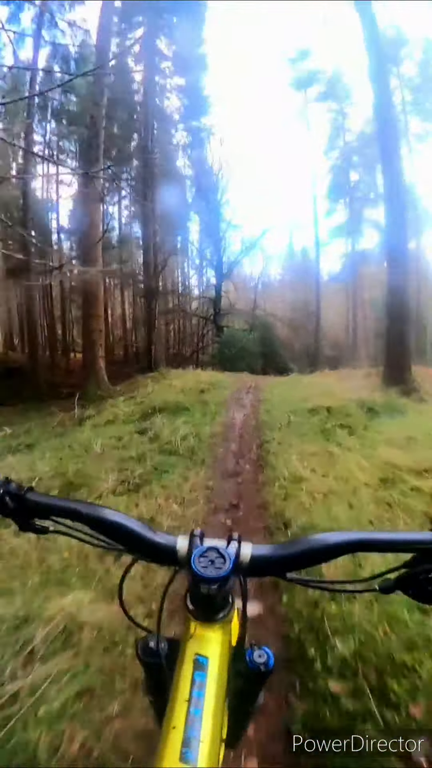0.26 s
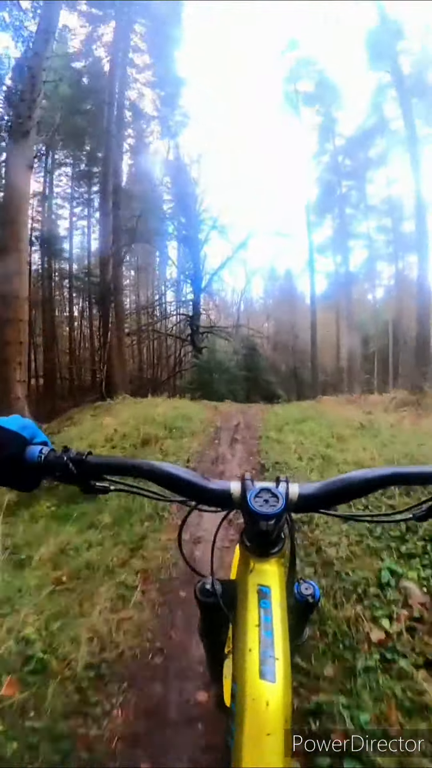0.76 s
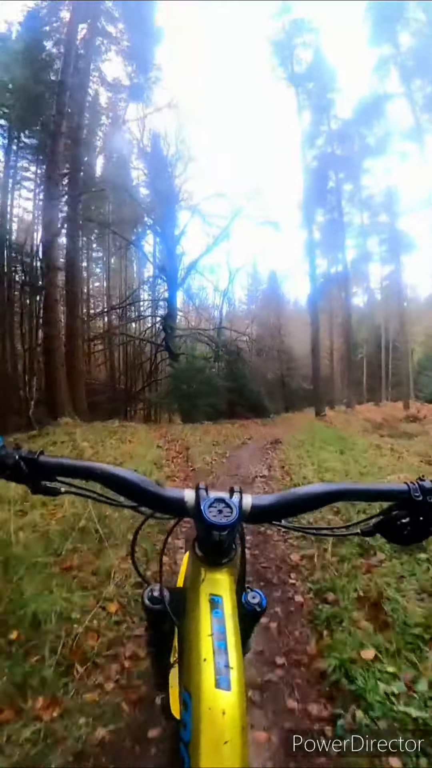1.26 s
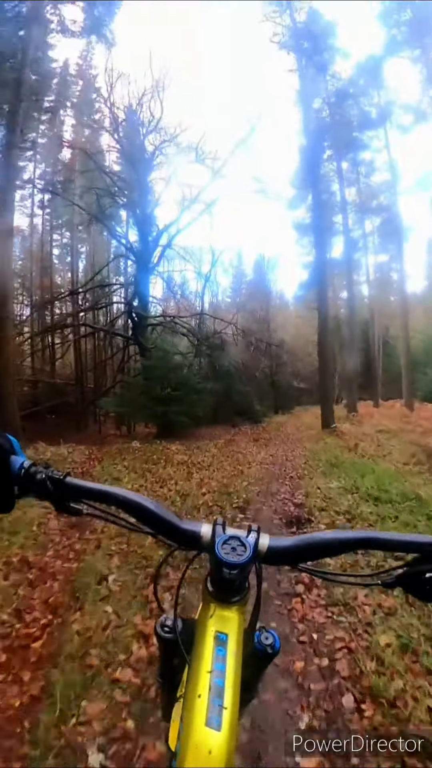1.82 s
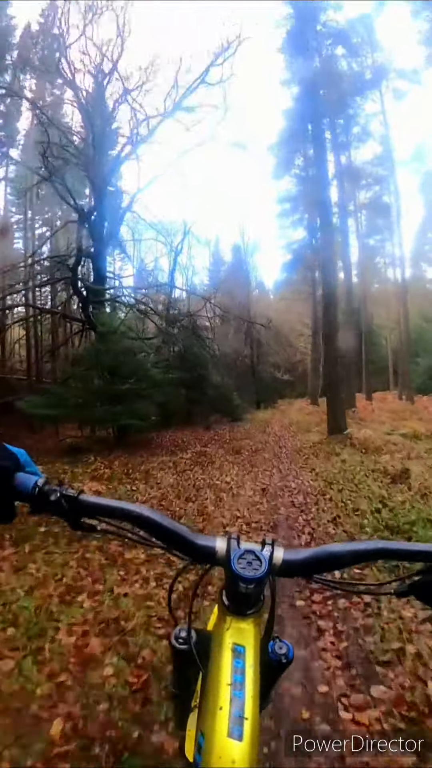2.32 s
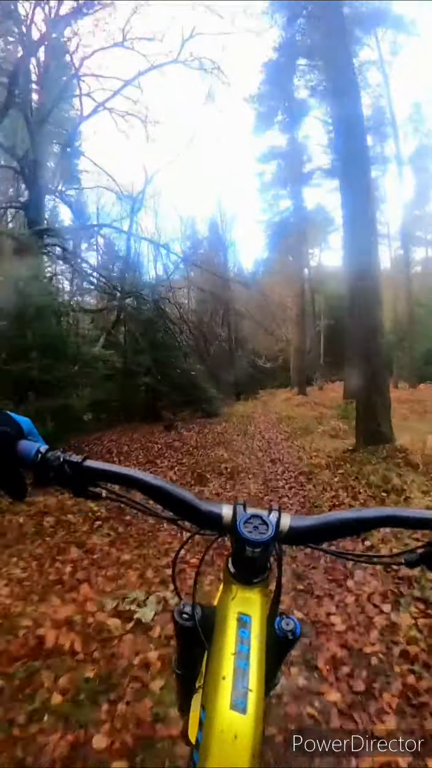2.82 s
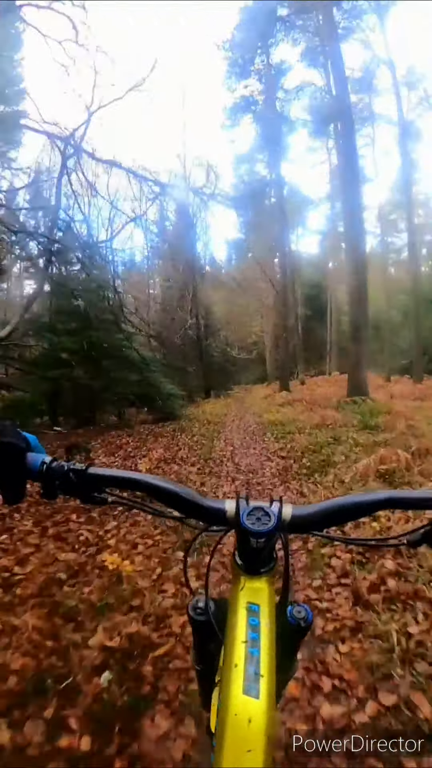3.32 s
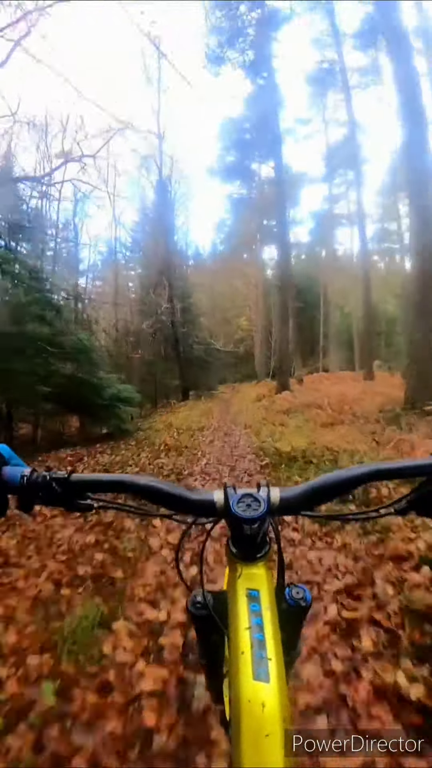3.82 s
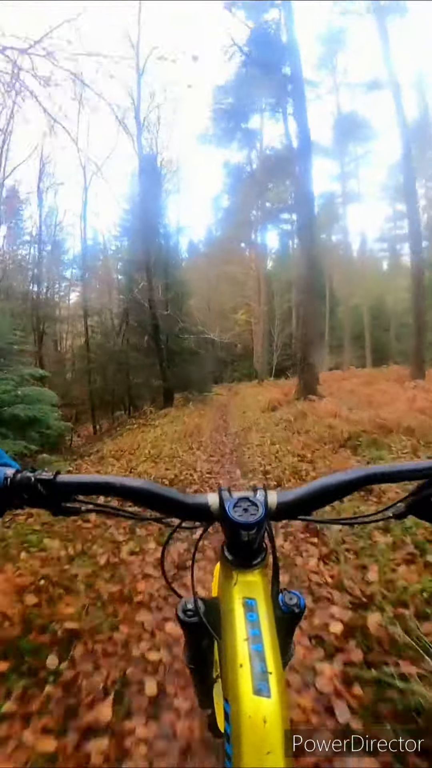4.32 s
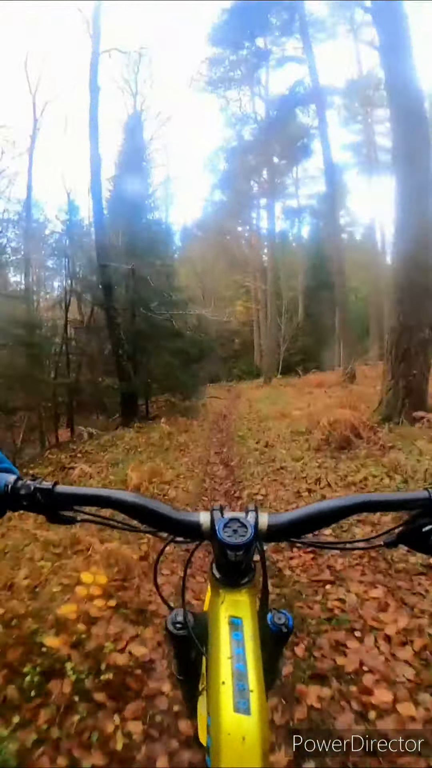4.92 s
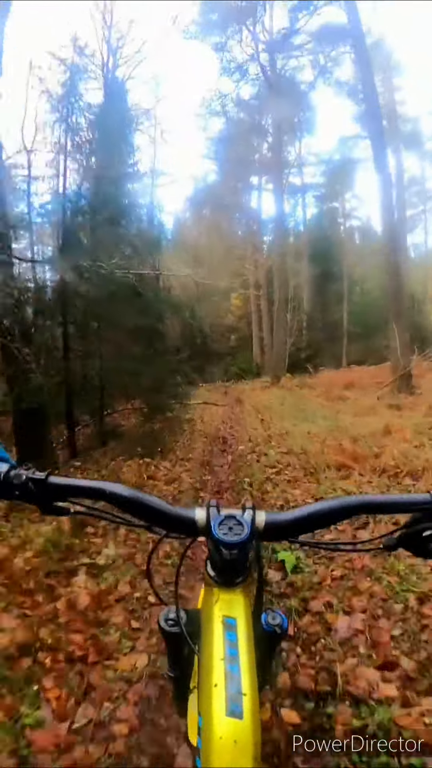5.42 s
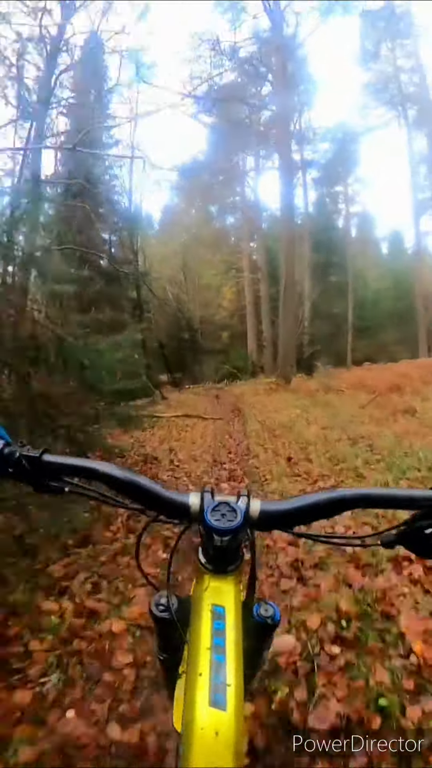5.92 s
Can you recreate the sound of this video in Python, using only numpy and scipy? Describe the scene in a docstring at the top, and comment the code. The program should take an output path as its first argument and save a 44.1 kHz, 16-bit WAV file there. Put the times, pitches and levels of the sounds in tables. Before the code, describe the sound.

Heard from a small microphone worn by the rider, a mountain bike jolts over a leaf-covered forest trail. The first second is loud, with low rumble, hollow tyre thumps, sharp twig snaps and dense crunching leaves. It then drops to soft drumming with faint rubbing and light bumps. After about three seconds the bike gathers speed, and crackle, snaps and thuds crowd back until the end.

```python
"""A mountain bike rolls down a leafy forest trail, heard through one small body-worn microphone.
A rough first second is dense with drumming, bumps, snaps and crackle; a quieter stretch with three soft rubs
follows, and from about 3 s the bike gathers speed and the crackle and bumps crowd together again.
Rumble, hiss and rustle are shaped noise; drumming is noise and ringing modes; bumps and snaps are decaying
sines; litter crackles as many tiny breaks over a continuous scratch."""
import sys
import numpy as np
from scipy import signal
from scipy.fft import rfft, irfft, next_fast_len
from scipy.io import wavfile
from scipy.ndimage import uniform_filter1d, map_coordinates

SR = 44100
rng = np.random.default_rng(int(sys.argv[2]) if len(sys.argv) > 2 else 0)


def file_out(sig):
    """Save sig as 16-bit WAV at sys.argv[1]."""
    # one column per channel
    cols = np.atleast_2d(sig).T
    # limit, then scale
    lim = np.clip(cols, -1, 1)
    pcm = np.round(lim * 32767).astype(np.int16)
    wavfile.write(sys.argv[1], SR, pcm)


N = 271656

# The ride: rough start, smooth stretch, then gathering speed.
# Each row: time in seconds, then shaking, coarse litter and fine leaves, each a relative level in dB.
RIDE = [(0.0, -31, -44, -54), (0.14, -32.5, -44.5, -55.5), (0.43, -29, -40, -48.5), (0.88, -29.5, -44, -55),
        (1.0, -38, -49, -57.5), (1.63, -40, -53.5, -54), (1.95, -41, -52.5, -59), (2.05, -40, -53.5, -58.5),
        (2.3, -38, -53, -54.5), (2.6, -39.5, -49, -53), (2.8, -40.5, -49, -53), (3.1, -36.5, -49.5, -49.5),
        (3.55, -32.5, -50.5, -49.5), (3.94, -34.5, -46, -46.5), (4.34, -33, -50, -48),
        (5.1, -30.5, -46.5, -47), (5.3, -33, -47.5, -47.5), (5.7, -31, -43, -49), (6.16, -34.5, -43, -47)]
CRUISE_DB = -34  # the shaking level against which the other layers are scaled


def amp(db):
    """Decibels to amplitude: 20 dB is a factor of ten."""
    return 10 ** (np.asarray(db) / 20)


def unit(x):
    """Normalisation to a root-mean-square of 1."""
    return x / np.sqrt(np.mean(x ** 2) + 1e-20)


def curves(rows):
    """Linear interpolation in time: one value per sample for each column after the time."""
    s, *cols = np.transpose(rows)
    return [np.interp(np.arange(N) / SR, s, c) for c in cols]


def wobble(rate):
    """Slow random modulation: a smooth curve through rate random knots a second."""
    knots = rng.standard_normal(int(N * rate / SR) + 4)
    return map_coordinates(knots, [np.arange(N) * rate / SR])


def filtered(x, response):
    """Linear filtering: the spectrum of x times a complex response of frequency."""
    m = next_fast_len(len(x) + 8192)  # padding leaves room for the filter's tail
    return irfft(rfft(x, m) * response(np.fft.rfftfreq(m, 1 / SR)), m)[:len(x)]


def coloured(x, points):
    """Spectral shaping by (Hz, dB) points joined on a logarithmic frequency axis, brought to rms 1."""
    f, db = np.transpose(points)
    return unit(filtered(x, lambda hz: amp(np.interp(np.log(hz + 1), np.log(f + 1), db))))


def resonance(f, centre_hz, width_hz):
    """Response of a damped resonator: a causal band-pass of gain 1 at its centre."""
    return 1j * f * width_hz / (centre_hz ** 2 - f * f + 1j * f * width_hz + 1e-9)


def crackle(size, per_s, centre_hz, octaves, share):
    """Granular noise: random small breaks, each a few decaying cycles, over a continuous scratch."""
    when, pitch, strength = rng.random((int(size * per_s / SR), 3)).T
    hz = centre_hz * 2 ** (octaves * (2 * pitch - 1))
    turns = np.arange(96) * hz[:, None] / SR  # cycles elapsed in each 96-sample grain
    fade = amp(-16 * strength[:, None] - 17.7 * turns)  # uneven strength, then 17.7 dB lost a cycle
    grains = fade * np.sin(2 * np.pi * turns) * np.sqrt(hz[:, None])
    place = (when * size).astype(int)[:, None] + np.arange(96)
    breaks = np.bincount(place.ravel(), grains.ravel(), size + 96)[:size]
    scratch = rng.standard_normal(size)
    return np.sqrt(share) * unit(breaks) + np.sqrt(1 - share) * scratch  # share is of the power


def patchy(x, patchy_db):
    """Time-frequency modulation: random gains in patches several hundred Hz by some hundredths of a second."""
    z = signal.stft(x, nperseg=256)[2]
    across_hz = uniform_filter1d(rng.standard_normal(z.shape), size=4, axis=0)
    field = uniform_filter1d(across_hz, size=8, axis=1)
    return signal.istft(z * amp(patchy_db * unit(field)), nperseg=256)[1][:N]


def load():
    """Contact force as a gain: rolling noise dips as the wheels go light over a hollow."""
    # Each row: centre in seconds, depth in dB (negative for a rise).
    hops = [(0.38, 4.5), (2.762, 2.5), (4.768, 4), (4.93, 2), (5.366, 4), (5.47, -1), (5.555, 1.5),
            (5.8, 2), (5.938, 4.5)]
    half_length_s = 0.033  # from the centre to 1/e of the depth
    t = np.arange(N) / SR
    return amp(-sum(db * np.exp(-((t - s) / half_length_s) ** 2) for s, db in hops))


def side_hiss():
    """Modulated noise: a faint flickering hiss that grows 0.84 dB per dB of shaking."""
    # Each row: frequency in Hz, relative gain in dB.
    hiss_spectrum = [(18, -37), (30, -8), (59, -16), (112, -31), (288, -19), (5850, -15), (9620, -18),
                     (11400, -42), (14900, -72), (22000, -120)]
    flicker_db = 14 * np.tanh(1.5 * wobble(14))  # bounded swings
    shake_db = curves(RIDE)[0]
    level_db = -77.0 + flicker_db + 0.84 * (shake_db - CRUISE_DB)
    return amp(level_db) * coloured(rng.standard_normal(N), hiss_spectrum)


def floor_hiss():
    """Stationary noise, slowly modulated: the hiss of tread and microphone under everything."""
    # Each row: frequency in Hz, relative gain in dB.
    floor_spectrum = [(760, -12), (1300, -19), (1960, 1), (2350, -5.5), (2720, -21.5), (5950, -10),
                      (8480, -19.5), (9200, -39), (9990, -21), (11400, -41), (14900, -101), (22000, -120)]
    return amp(-56.5 + 1.9 * wobble(7.4)) * coloured(rng.standard_normal(N), floor_spectrum)


def rumble():
    """Low-frequency pressure from air and shaking pushes in slow lumps; a heavy jolt adds one brief heave."""
    # Each row: frequency in Hz, relative gain in dB.
    rumble_spectrum = [(2.9, -36), (5.0, -0.5), (28, -3), (45, -8.5), (76, -17), (170, -27), (220, -26),
                       (370, -120)]
    # Heavy jolts, and one low thump near 180 Hz at 0.875 s. Each row: start in seconds, level in dB, swing
    # frequency in Hz.
    jolts = [(0.07, -16.5, 24), (0.197, -21.5, 61), (0.3, -23, 35.6), (0.35, -28, 45), (0.425, -20.5, 54.3),
             (0.509, -19.5, 28), (0.64, -20.5, 40), (0.875, -23, 179), (0.915, -22.5, 56), (1.13, -26, 35),
             (1.99, -33.5, 40), (2.145, -35, 38.2), (2.235, -39, 40), (2.42, -34, 39.8), (2.71, -31.5, 40),
             (2.8, -32, 40), (2.911, -25.5, 29.3), (3.519, -27, 50), (3.649, -24, 27.4), (3.915, -23, 48.4),
             (4.041, -20, 27.1), (4.249, -22.5, 54.4), (5.268, -31, 35.2), (5.421, -21.5, 23.8),
             (5.63, -21, 27.7)]
    swings = 1.4  # cycles in one heave
    lumps = amp(2.0 * wobble(15)) * rng.standard_normal(N)
    out, t = np.zeros(N + SR), np.arange(SR // 5) / SR
    for (s, db, hz), turn in zip(jolts, rng.random(len(jolts))):
        swell = np.sin(np.pi * np.clip(t * hz / swings, 0, 1)) ** 2
        heave = swell * np.sin(2 * np.pi * (hz * t + turn))
        out[round(s * SR):][:len(t)] += amp(db) * heave
    return amp(curves(RIDE)[0]) * coloured(lumps, rumble_spectrum) + out[:N]


def rubs():
    """Friction noise in one resonant band: something soft drags against the tyre, swelling and fading."""
    # Each row: start in seconds, length in seconds, level in dB before the swell, centre in Hz.
    drags = [(1.77, 0.28, -54, 564), (1.7, 0.033, -44, 470), (1.37, 0.076, -52, 650)]
    t = np.arange(N) / SR
    out = np.zeros(N)
    for s, length, db, hz in drags:
        swell = np.sqrt(np.abs(np.sin(np.pi * np.clip((t - s) / length, 0, 1))))
        grain = amp(1.5 * wobble(40.0)) * rng.standard_normal(N)
        band = filtered(grain, lambda f: resonance(f, hz, 0.34 * hz) ** 2)
        out += amp(db) * swell * unit(band)
    return out


def snaps():
    """Impulsive fracture: twigs and loose parts ring a few cycles in three partials, over a wide dry crack."""
    # Each row: start in seconds, level in dB, pitch in Hz.
    ticks = [(0.077, -26, 1700), (0.183, -22, 1120), (0.2, -24, 2190), (0.229, -29, 2800),
             (0.248, -21, 4830), (0.268, -21, 1740), (0.284, -18, 1740), (0.307, -20, 1570),
             (0.319, -22, 835), (0.351, -27, 1300), (0.406, -21, 877), (0.433, -28, 895),
             (0.45, -17.5, 2180), (0.517, -13, 930), (0.541, -28, 940), (0.565, -22, 950),
             (0.598, -27, 1090), (0.618, -27, 1510), (0.644, -23, 855), (0.651, -19.5, 865),
             (0.668, -33, 5000), (0.7, -21, 1570), (0.728, -21, 1710), (0.744, -25, 1700),
             (0.765, -26, 860), (0.792, -41, 1650), (0.803, -40, 1670), (0.781, -28, 5400),
             (0.813, -28, 1170), (0.826, -24, 5400), (0.897, -28, 810), (0.984, -34, 1130),
             (3.122, -22.5, 1760), (3.445, -27, 3250), (3.572, -30, 3130), (3.576, -33, 1660),
             (3.697, -28, 2270), (3.708, -16, 2860), (3.757, -28, 3140), (3.79, -21, 870),
             (3.827, -24.5, 2490), (3.875, -24, 3700), (3.92, -21, 4000), (3.926, -27, 2200),
             (4.0, -25, 3500), (4.075, -28, 1000), (4.082, -23, 750), (4.085, -22, 1910), (4.1, -21, 1310),
             (4.105, -26, 900), (4.623, -26, 3500), (4.662, -26, 3550), (4.809, -24.5, 3120),
             (4.958, -30, 3240), (5.415, -33, 3450), (5.579, -32, 1700), (5.614, -22.5, 2340),
             (5.652, -21, 1840), (5.664, -28, 800), (5.686, -38, 1300), (5.779, -35, 900),
             (5.839, -27, 1560), (5.964, -21, 1750)]
    crack_db, crack_t60_s = -8, 0.003
    partials = [(.6, 0.46), (1, 0.85), (1.7, 0.083)]  # ratio to the pitch, amplitude
    out, t = np.zeros(N + SR), np.arange(SR // 40) / SR
    for (s, db, hz), noise in zip(ticks, rng.standard_normal((len(ticks), len(t)))):
        ring = sum(share * np.sin(2 * np.pi * ratio * hz * t) for ratio, share in partials)
        t60_s = .003 + 5 / hz
        fade = amp(-60 * t / t60_s) * (1 - np.exp(-t / .0002))
        burst = amp(crack_db - 60 * t / crack_t60_s) * noise
        crack = filtered(burst, lambda f: resonance(f, 1.2 * hz, 3 * hz) / (1 + 1j * f / 9000) ** 4)
        out[round(s * SR):][:len(t)] += amp(db) * (crack - fade * ring)
    return out[:N]


def bumps():
    """Modal ringing: a root or stone excites the tyre's air, each mode a little differently every time."""
    # Roots and stones. Each row: start in seconds, level in dB.
    hits = [(0.212, -19), (0.272, -14.5), (0.408, -18), (0.434, -12.5), (0.549, -27), (0.593, -15),
            (0.66, -18), (0.733, -30), (0.816, -31), (0.877, -18), (0.984, -28), (1.195, -24), (1.362, -32),
            (1.579, -24.5), (1.788, -29), (2.002, -25), (2.134, -29), (2.217, -40), (2.294, -41),
            (2.336, -25), (2.473, -25), (2.588, -25), (2.729, -24.5), (2.819, -23.5), (2.915, -40),
            (3.155, -23), (3.213, -26), (3.603, -21), (3.693, -26), (3.79, -22), (3.827, -22), (3.854, -19),
            (3.903, -19.5), (4.084, -23), (4.215, -25), (4.36, -30), (4.471, -19.5), (4.519, -23),
            (4.589, -20), (4.694, -19), (4.738, -18.5), (4.879, -18.5), (4.982, -15), (5.012, -17),
            (5.148, -24), (5.32, -29), (5.41, -16.5), (5.445, -21), (5.509, -28), (5.599, -17),
            (5.655, -13), (5.688, -17.5), (5.761, -20), (5.829, -23), (5.889, -17), (5.972, -25),
            (6.019, -26), (6.07, -18.5)]
    # The tyre's modes. Each row: frequency in Hz, mean relative level in dB, 60 dB decay time in seconds.
    modes = [(206, -9.5, 0.051), (308, -6, 0.04), (360, -7.5, 0.034)]
    out, t = np.zeros(N + SR), np.arange(SR // 8) / SR
    onset = 1 - np.exp(-t / 0.0043)
    for (s, db), chance in zip(hits, rng.standard_normal((len(hits), len(modes)))):
        ring = np.zeros(len(t))
        for (hz, level, t60), c in zip(modes, chance):
            ring += amp(level + 1.1 * c - 60 * t / t60) * np.sin(2 * np.pi * hz * t)
        out[round(s * SR):][:len(t)] += amp(db) * onset * ring
    return out[:N]


def bursts():
    """Granular excitation of resonators: each heap of litter crackles, rings the loose parts and dies away."""
    # Heaps of litter. Each row: start in seconds, relative level in dB at the top of the swell, centre in Hz.
    heaps = [(0.192, -40.5, 1490), (0.212, -47.5, 1790), (0.241, -42.5, 3000), (0.257, -42, 1500),
             (0.3, -37.5, 1420), (0.4, -45, 870), (0.434, -36.5, 940), (0.495, -47, 965),
             (0.577, -42.5, 1300), (0.634, -40.5, 900), (0.724, -42, 1040), (0.803, -42.5, 1490),
             (0.868, -47, 890), (1.183, -46, 1080), (1.358, -50, 935), (1.76, -51, 3540),
             (1.99, -51.5, 1370), (2.22, -52, 2010), (2.434, -55, 1800), (2.805, -54, 2500),
             (2.88, -47.5, 1300), (2.94, -46, 1700), (3.038, -47.5, 1800), (3.112, -42.5, 2150),
             (3.155, -45, 1060), (3.207, -52, 1560), (3.282, -44.5, 980), (3.431, -49.5, 3220),
             (3.561, -45.5, 3200), (3.631, -42, 3060), (3.69, -41.5, 2300), (3.707, -44, 2900),
             (3.853, -41.5, 2320), (3.911, -45.5, 4130), (3.979, -47, 3400), (4.068, -44.5, 1760),
             (4.185, -45, 4620), (4.393, -45.5, 2190), (4.504, -46, 3600), (4.601, -46, 3620),
             (4.65, -44, 3250), (4.793, -40, 2770), (4.843, -47, 4040), (4.944, -41, 4000),
             (5.211, -44.5, 1350), (5.282, -48, 1260), (5.399, -35.5, 3100), (5.494, -45, 2500),
             (5.573, -39.5, 2800), (5.647, -40, 2120), (5.711, -41.5, 2500), (5.828, -39.5, 3450),
             (5.873, -42.5, 2000), (5.953, -38.5, 2650), (6.01, -46, 1170), (6.081, -47, 3480)]
    # Loose parts that ring. Each row: frequency in Hz, width in Hz, gain in dB.
    loose_parts = [(1720, 45, -1), (3460, 670, -3.5), (5480, 1250, -0.5)]
    rise_s, fade_s = 0.0059, 0.024  # time constants
    out, t = np.zeros(N + SR), np.arange(SR // 4) / SR
    swell = (1 - np.exp(-t / rise_s)) ** 2 * np.exp(-(t / fade_s) ** 0.99)

    def ringing(f):
        """Superposition: the direct sound plus one resonance for each loose part."""
        return 1 + sum(amp(db) * resonance(f, c, w) for c, w, db in loose_parts)

    for s, db, hz in heaps:
        grains = crackle(len(t), 1000, hz, octaves=1.43, share=0.36)
        tone = unit(filtered(
            grains, lambda f: ringing(f) * resonance(f, hz, 1.87 * hz) / (1 + 1j * (f / 6500) ** 6)))
        out[round(s * SR):][:len(t)] += amp(db) * swell / swell.max() * tone
    return out[:N]


def tyre_drum():
    """Forced vibration of the tyre: pebble pings, a low droning mode and broad drumming on the soil."""
    # Each row: frequency in Hz, relative gain in dB.
    drum_spectrum = [(65, -3), (110, 1.5), (237, -2), (323, -3.5), (460, -12.5), (550, -11.5), (720, -29),
                     (1210, -120)]
    # The low mode drones, then fades. Each row: time in seconds, level in dB against the broad drumming.
    drone_level = [(2.3, -6), (2.9, -20)]
    pebbles_per_s = 60
    pebbles = (rng.random(N) < pebbles_per_s / SR) * rng.standard_normal(N)
    pings = unit(filtered(pebbles, lambda f: resonance(f, 333, 120) ** 2))
    drone_noise = amp(2.2 * wobble(25)) * rng.standard_normal(N)
    drone = unit(filtered(drone_noise, lambda f: resonance(f, 200, 45) ** 2))
    broad = coloured(amp(2.66 * wobble(50)) * rng.standard_normal(N), drum_spectrum)
    return 0.35 * pings + amp(curves(drone_level)[0]) * drone + broad


def litter_rub():
    """Stick-slip and fracture noise: twigs and leaves crackle in clumps that deepen with the shaking."""
    # Coarse litter, then fine leaves. Each row: frequency in Hz, relative gain in dB.
    litter_spectrum = [(150, -16), (300, 8), (420, -1.5), (501, -3), (860, -3), (1450, -3.5), (1830, -5),
                       (2600, -9.5), (3380, -16.5), (5720, -120)]
    leaves_spectrum = [(1240, -14.5), (2100, -4), (2560, 0), (3480, 3.5), (3980, 2), (5750, 1.5),
                       (7860, -10), (8560, -10), (9860, -18), (11400, -91), (14900, -104), (22000, -120)]
    shake_db, litter_db, leaves_db = curves(RIDE)
    rough = amp(0.36 * (shake_db - CRUISE_DB))  # scales the depth of the clumps
    clumps = .8 * rough * wobble(30)  # dB, shared by both sizes of litter
    scrape = 1.56 * rough * wobble(60)  # dB
    rustle = 1.4 * rough * wobble(50)  # dB
    litter = amp(clumps + scrape) * crackle(N, 300, 1190, octaves=1.03, share=0.039)
    leaves = amp(clumps + rustle) * crackle(N, 900, 3450, octaves=1.38, share=0.22)
    coarse = amp(litter_db) * coloured(litter, litter_spectrum)
    fine = amp(leaves_db) * coloured(leaves, leaves_spectrum)
    return coarse + fine


def rolling():
    """Rolling contact: drumming follows the shaking dB for dB, and contact force scales drum and litter."""
    drum_db, drum_follows = -45, 1  # level at cruising shake; dB per dB of shaking
    drum_gain = amp(drum_db + drum_follows * (curves(RIDE)[0] - CRUISE_DB))
    return load() * (drum_gain * tyre_drum() + patchy(litter_rub(), patchy_db=1.5))


def scene():
    """Superposition: one mono sum feeds both channels, and the side hiss enters them in opposite phase."""
    mono = floor_hiss() + rumble() + rubs() + snaps() + bumps()
    mono += load() * patchy(bursts(), patchy_db=2.4) + rolling()
    hiss = side_hiss()
    return np.array([mono + hiss, mono - hiss])


def record(dry):
    """Band limiting: the camera keeps nothing from its upper limit upward."""
    top_hz = 11650
    return np.array([filtered(side, lambda hz: hz < top_hz) for side in dry])


dry = scene()
out = record(dry)
file_out(out)
```